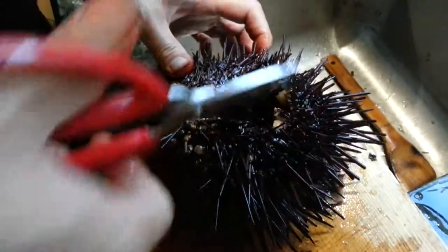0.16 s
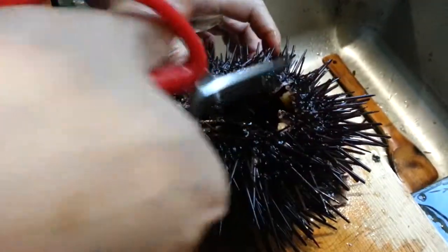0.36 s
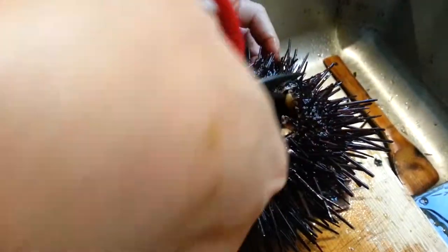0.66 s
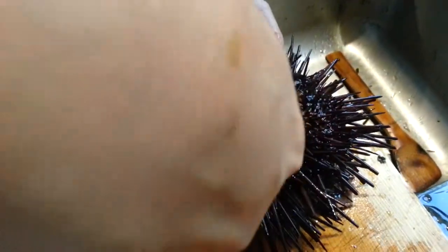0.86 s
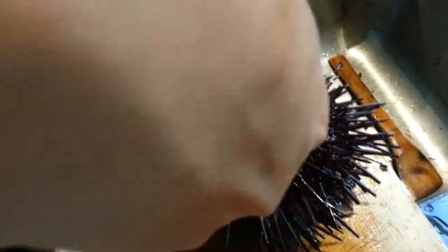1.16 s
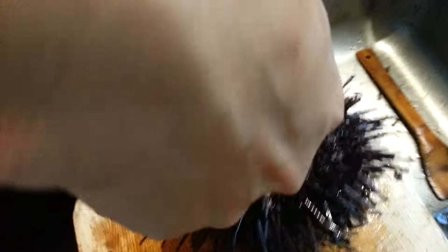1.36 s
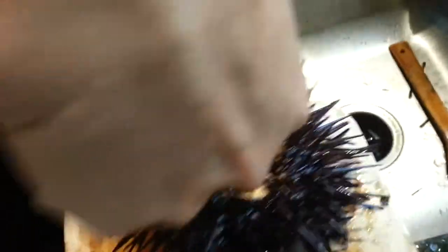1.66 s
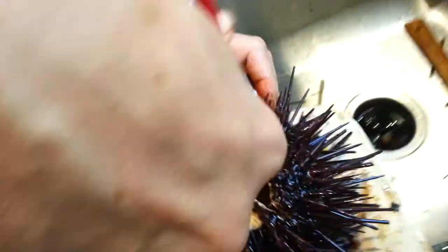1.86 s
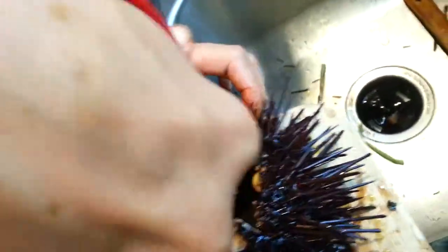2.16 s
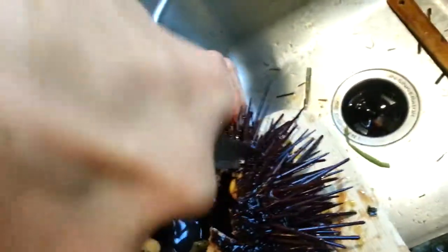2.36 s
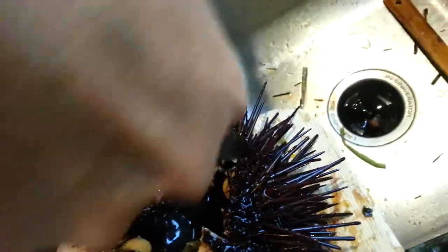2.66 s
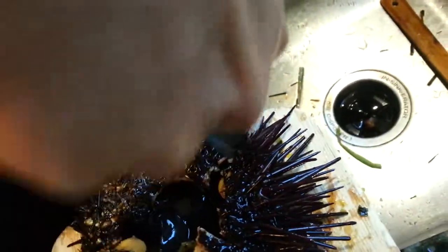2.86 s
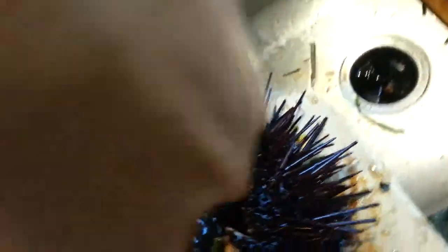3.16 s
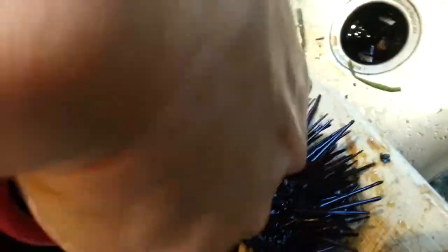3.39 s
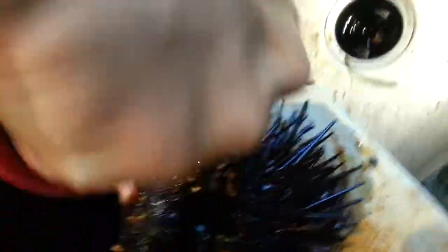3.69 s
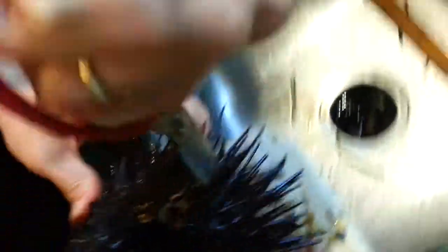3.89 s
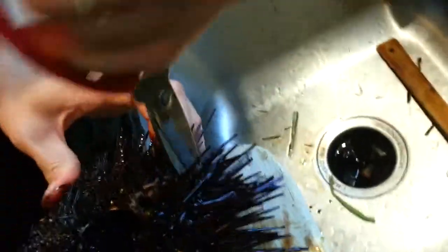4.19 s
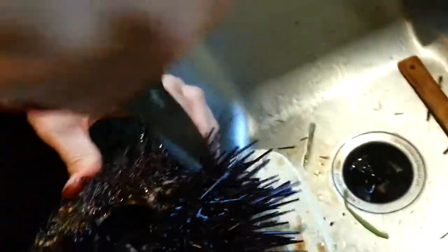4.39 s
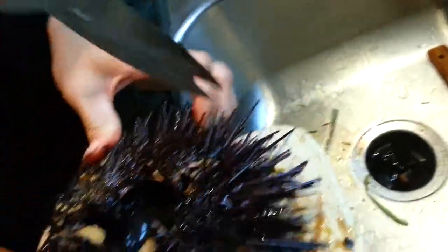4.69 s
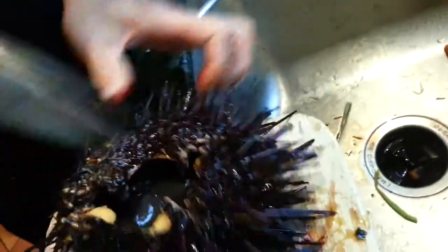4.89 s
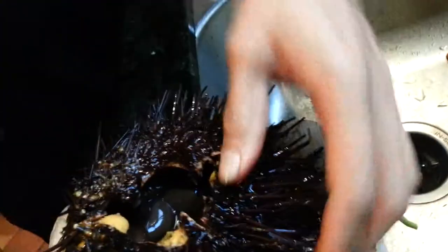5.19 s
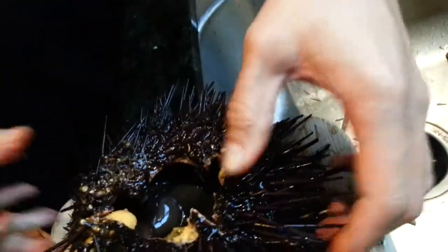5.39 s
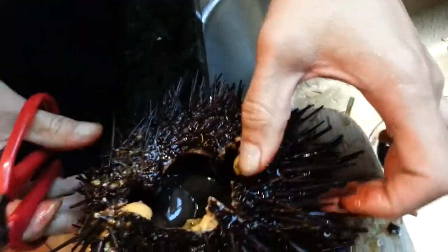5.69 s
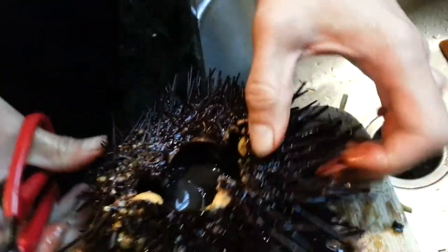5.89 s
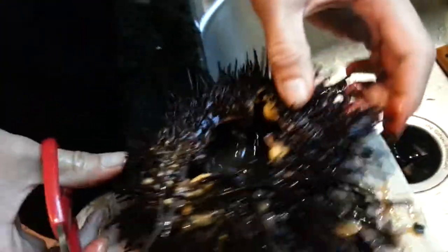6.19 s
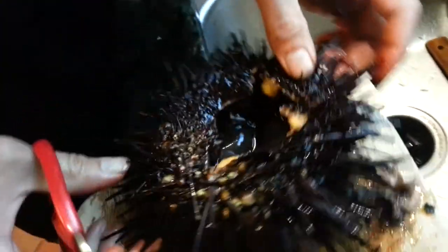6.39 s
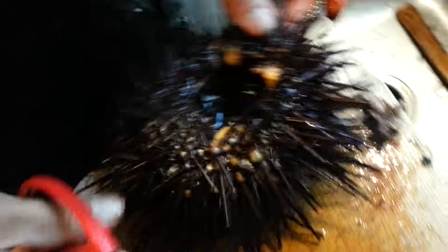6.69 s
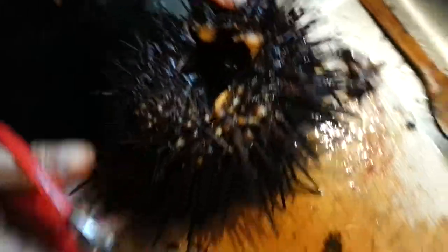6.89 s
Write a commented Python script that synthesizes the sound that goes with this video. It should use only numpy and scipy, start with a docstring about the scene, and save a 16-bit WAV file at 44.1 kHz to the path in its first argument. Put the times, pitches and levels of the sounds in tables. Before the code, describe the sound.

Scissors crunch through a brittle, hollow sea urchin shell in sharp bursts, then rasp, while spines rustle, tick and knock on a wooden board.

```python
"""The shell of a sea urchin breaks under kitchen scissors in clusters of brittle cracks, on a wooden board.
Each crack is a noise burst that excites a board thud, shell resonances and a spray of splinters.
The blades clash, ringing loudest once, and slide along the cut edge as filtered stick-slip noise.
Spines rustle, tick and knock on the board as a hand turns the urchin.
A steel sink and a kitchen return decaying noise echoes; a faint coloured-noise hum lies below."""
import sys
import numpy as np
from scipy import signal
from scipy.fft import rfft, irfft, next_fast_len
from scipy.io import wavfile

SR = 44100
rng = np.random.default_rng(int(sys.argv[2]) if len(sys.argv) > 2 else 0)


def bounce(signal):
    """Save signal as a 16-bit WAV file at the path given by the first command-line argument."""
    frames = np.transpose(np.atleast_2d(signal))
    limited = np.clip(frames, -1, 1)
    pcm = np.round(limited * 32767).astype(np.int16)
    wavfile.write(sys.argv[1], SR, pcm)


N = 310905   # length in samples

# Breaks of shell or spine; sharp ones splinter, dull ones ring the hollow.
# Each row: start in seconds, level in dB, sharpness in dB, left-right balance in dB.
SHELL_CRACKS = [(0.75, -56, -7, 2), (1.03, -63.5, -14.5, 4), (1.047, -54, -7, 2), (1.107, -50, -5, 6),
                (1.202, -59, -17.5, 2), (1.8079, -46, 2, 4), (1.8461, -28, 2, 2.5), (1.875, -30, 3, -0.5),
                (1.8918, -30, 2, 1), (2.016, -35, -4.5, 1), (2.041, -34, 1.5, -1.5), (2.083, -20, -0.5, -3),
                (2.0865, -19.5, 2.5, 5.5), (2.0993, -21, 0, 7.5), (2.1033, -24.5, 4.5, -5.5),
                (2.276, -59, -15, 2), (2.3483, -41.5, 1.5, -3), (2.3638, -20, -2, 2.5),
                (2.393, -33, 2.5, -5), (2.4164, -32, 12, 0.5), (2.4268, -26.5, -2.5, -1.5),
                (2.612, -50, -5.5, -5), (2.625, -50, -6.5, 5), (2.951, -57, 0, -3), (3.009, -52.5, -3.5, 0),
                (3.25, -52.5, -12, 0), (3.4834, -41, 1, 2), (3.492, -38, -1.5, 2),
                (3.5174, -31.5, -0.5, 1.5), (3.556, -38, -0.5, 2), (3.5664, -44, -10.5, 0),
                (3.6118, -36.5, 3, 3), (3.6277, -26.5, 3, 2), (3.7352, -43.5, 2.5, 1),
                (3.7602, -32, 3.5, 0), (3.8826, -36.5, 6, -3), (3.902, -44.5, 14.5, 3),
                (3.984, -43, -8.5, -8), (3.9928, -36, 5, 1.5), (4.305, -42.5, 1.5, -7), (4.851, -49, -5, 0),
                (5.8031, -47.5, 8.5, -1), (6.1907, -40.5, 5.5, 4.5), (6.245, -46.5, 6.5, -2),
                (6.2945, -49, 2.5, 3), (6.374, -41.5, 12.5, 3), (6.8921, -44, 6.5, -1)]
# Resonances of the hollow shell. Each row: frequency in Hz, width in Hz, level in dB.
HOLLOW_MODES = [(765, 55, -6), (930, 55, 3), (970, 300, -9)]
# Resonances of the shell wall. Each row: frequency in Hz, width in Hz, level in dB.
WALL_MODES = [(1445, 38, -3.5), (1684, 130, -5), (1753, 40, -2), (1934, 15, 2), (2006, 48, -6),
              (2190, 28, -7.5), (2794, 70, -5.5), (3000, 41, -7), (4065, 215, -0.5), (3980, 260, -3),
              (5250, 340, -11.5), (1960, 2060, -8.5)]
# Spectrum of splinters and spine tips. Each row: frequency in Hz, level in dB.
SPLINTER_SPECTRUM = [(2500, -11), (4500, 2.5), (6000, -4.5), (7700, -2.5), (10000, -3), (14500, -1.5)]
# Spectrum of a dull thud of the board. Each row: frequency in Hz, level in dB.
THUD_SPECTRUM = [(25, -30), (55, -24), (110, 0.5), (210, 5), (350, 6.5), (550, -0.5), (800, -20),
                 (1500, -71.5)]
THUD_DB, THUD_FOLLOWS = -24, 0.66   # thud under a 0 dB crack; share of the crack's dB that it follows
HOLLOW_PAN_DB, WALL_PAN_DB, SPLINTER_PAN_DB = -2.8, 1, -1   # left-right balance of each part
RUN_S, RUN_GROWTH = 0.0012, 0.15   # decay time of a 0 dB crack; it grows with strength to this power


def shell_cracks():
    """Brittle fracture: each break thumps the board, excites shell modes and splinters; big ones run longer."""
    out = np.zeros((2, N))
    for start_s, db, sharp_db, pan_db in SHELL_CRACKS:
        run_s = RUN_S * from_db(RUN_GROWTH * db)
        burst = fracture(run_s=run_s, run_db=6.0, scatter_db=3, scatter_s=0.0038)
        spray = fracture(run_s=run_s, run_db=8.0, scatter_db=7.5, scatter_s=0.0089)
        thud = from_db(THUD_DB + THUD_FOLLOWS * db) * attack_one(colour(burst, THUD_SPECTRUM))
        hollow = from_db(db - sharp_db) * strike(burst, HOLLOW_MODES, spread_db=1.5)
        wall = from_db(db) * strike(burst, WALL_MODES, spread_db=2.0)
        splinters = from_db(db + sharp_db) * attack_one(colour(spray, SPLINTER_SPECTRUM))
        shell = hollow * sides(HOLLOW_PAN_DB) + wall * sides(WALL_PAN_DB)
        add(out, start_s, thud + shell + splinters * sides(SPLINTER_PAN_DB), pan_db)
    return out


# The blades jump shut. Each row: start in seconds, level in dB.
BLADE_CLASHES = [(1.8465, -42), (1.893, -41), (2.018, -44), (2.0855, -17)]
# Resonances of a blade. Each row: frequency in Hz, width in Hz, level in dB.
BLADE_MODES = [(3890, 42, 0), (3955, 8, -10.5)]


def blade_clashes():
    """Impulse response: a short contact sets the narrow steel resonances ringing."""
    return blows(BLADE_CLASHES, BLADE_MODES)


# The blades slide along the cut edge. Each row: start in seconds, length in seconds, level in dB.
BLADE_SLIDES = [(4.001, 0.29, -27.5), (4.365, 0.11, -40.5)]
# Resonances of blade and shell in the slide. Each row: frequency in Hz, width in Hz, level in dB.
BLADE_SLIDE_MODES = [(880, 120, -7.5), (1640, 420, -6.5), (2900, 780, -3), (3870, 170, 6.5),
                     (4410, 180, 1.5), (4860, 120, 5.5), (5460, 440, -3), (6240, 280, -6.5)]
SLIDE_SWELL = 2.18   # amplitude goes with blade speed to this power


def blade_slide():
    """Stick-slip friction: dense slips on the chalky edge excite blade and shell, loudest in mid-stroke."""
    t, level = np.arange(N) / SR, 0
    for start_s, length_s, db in BLADE_SLIDES:
        speed = np.abs(np.sin(np.pi * np.clip((t - start_s) / length_s, 0, 1)))
        level = level + from_db(db) * speed ** SLIDE_SWELL
    slips = grains(per_s=1400, spread_db=2.0, clump_db=0.4)
    chalk_spectrum = [(900, -24.5), (1500, 8), (3000, -10.0), (6200, -1), (7500, -2.0),
                      (11500, 3.5), (14500, -1.5)]   # Hz, dB
    chalk = colour(slips, chalk_spectrum)
    rasp = rub(slips, BLADE_SLIDE_MODES) + from_db(-4.5) * rms_one(chalk)
    return level * rasp * from_db([[-1.1], [.8]])   # a little to the right


# Level of the steady rustle under the hands. Each row: time in seconds, level in dB.
HANDLING_LEVEL = [(0, -89), (0.3, -68), (1.0, -73), (1.15, -52.5), (1.75, -55.5), (2.2, -50.5), (2.33, -59),
                  (2.55, -57.5), (2.9, -59.5), (3.3, -50), (4.4, -48.5), (4.6, -57.5), (4.95, -51.5),
                  (5.1, -62), (5.5, -62), (6.1, -47), (6.55, -50.5), (7.05, -55.5)]
# Blades or fingers brush through the spines.
# Each row: start in seconds, length in seconds, level in dB, tip hiss relative to it in dB.
SPINE_BRUSHES = [(0.544, 0.048, -62.5, 4), (0.704, 0.066, -54, -4), (0.814, 0.042, -50, 0.5),
                 (1.057, 0.055, -49.5, -0.5), (1.23, 0.12, -48.5, -23), (1.538, 0.12, -44, -5.5),
                 (1.77, 0.082, -39.5, -9), (2.002, .075, -45, -6), (3.007, 0.073, -48, -13),
                 (3.243, .035, -44.5, -7), (3.275, 0.072, -38, -4.5), (3.344, 0.071, -44.5, -25),
                 (3.443, 0.22, -44.5, -16), (3.86, 0.051, -43, -7), (3.937, 0.09, -45.5, -2.5),
                 (4.254, 0.095, -42, -3), (4.375, .085, -44, 4.5), (4.644, 0.12, -44.5, -4),
                 (4.78, 0.093, -44.5, -4), (4.935, 0.051, -50, -6), (5.241, 0.092, -56.5, -4),
                 (5.764, 0.11, -49.5, -7), (5.97, 0.18, -53, -3), (6.09, 0.2, -45, -6),
                 (6.31, 0.18, -48.5, -9), (6.604, 0.17, -45.5, -3.5), (6.888, 0.067, -48, -3)]
# The urchin is dragged over the board. Each row: start in seconds, length in seconds, level in dB.
BOARD_DRAGS = [(0.23, 0.09, -80), (1.1, 0.06, -59), (1.5, 0.072, -59), (1.82, 0.081, -41),
               (3.34, .075, -42.5), (3.49, .18, -43.5), (4.06, 0.13, -36.5), (4.52, 0.051, -53),
               (4.71, .17, -51), (6.02, 0.058, -45.5), (6.13, 0.085, -48), (6.35, 0.19, -58),
               (6.67, 0.13, -50)]
# How firmly the blades sit in the shell. Each row: time in seconds, share from 0 to 1.
BLADE_BITE = [(0, 0.4), (1.0, 0.81), (4.45, 0.97), (4.7, 0.04), (5.8, 0.06)]
# Resonances of the dragged board. Each row: frequency in Hz, width in Hz, level in dB.
RUMBLE_MODES = [(188.8, 58, -8.5), (291, 70, -3.5), (406, 103, -1), (445, 34, 2), (592, 110, -4)]
# Resonances rubbed by blades in the shell. Each row: frequency in Hz, width in Hz, level in dB.
BLADE_GRIND_MODES = [(762, 41, -9), (929, 54, 7.5), (1050, 214, -5), (1453, 116, 1.5), (1770, 58, -4),
                     (2120, 49, -1.5), (2440, 880, -6.5), (3400, 1160, -7), (4200, 300, -2),
                     (4800, 700, -8.5)]
# Resonances of spines rubbed over wood. Each row: frequency in Hz, width in Hz, level in dB.
BOARD_GRIND_MODES = [(887, 300, 0), (1390, 410, 0), (1435, 106, 6), (1640, 92, -7), (1790, 350, -2),
                     (2900, 1700, -2), (3340, 400, 2.5), (4140, 510, -6.5), (4950, 560, -0.5),
                     (6660, 1500, -15)]
# Spectrum of hissing spine tips. Each row: frequency in Hz, level in dB.
TIP_HISS_SPECTRUM = [(3000, -40), (5200, -1.5), (6500, -1), (9000, 2), (14500, 0)]
RUMBLE_DB, HISS_DB = -4.5, -5   # steady board rumble and tip hiss, relative to the steady rustle
CRACKLE_DB = -11.5   # stray crackle, relative to the grind of slips


def spine_rustle():
    """Stick-slip friction: spines rub on each other, blades and wood; sparse slips crackle."""
    hand_db, = in_time(HANDLING_LEVEL)
    brush_rows = [(start_s, length_s, db) for start_s, length_s, db, _ in SPINE_BRUSHES]
    hiss_rows = [(start_s, length_s, db + hiss_db) for start_s, length_s, db, hiss_db in SPINE_BRUSHES]
    dragging = strokes(BOARD_DRAGS, hand_db + RUMBLE_DB)
    brushing = strokes(brush_rows, hand_db)
    flicking = strokes(hiss_rows, hand_db + HISS_DB)
    bite = np.clip(in_time(BLADE_BITE)[0], 0, 1)
    slips = grains(per_s=1900, spread_db=3.5, clump_db=1.6)
    flicks = grains(per_s=1700, spread_db=-2.0, clump_db=2.3)
    snaps = grains(per_s=28, spread_db=1.0, clump_db=0.5)
    rumble = dragging * rub(slips, RUMBLE_MODES)
    # blades in the shell ring its hollow; a bare hand only drives the spines over the wood
    blade_grind = np.sqrt(bite) * rub(slips, BLADE_GRIND_MODES)
    board_grind = np.sqrt(1 - bite) * rub(slips, BOARD_GRIND_MODES)
    soften = signal.butter(2, 6000, fs=SR, output="sos")
    grind = signal.sosfilt(soften, blade_grind + board_grind)
    crackle = from_db(CRACKLE_DB) * rub(snaps, WALL_MODES)
    hiss = flicking * rms_one(colour(flicks, TIP_HISS_SPECTRUM))
    return rumble + brushing * (grind + crackle) + hiss


# Spine tips flick past each other.
# Each row: start in seconds, level in dB, left-right balance in dB.
SPINE_TICKS = [(1.707, -50, 4), (2.944, -53, -4), (3.278, -40.5, 6), (3.343, -52, 2), (4.435, -32, -6),
               (4.576, -58, -9), (4.883, -38.5, -4), (5.134, -57, -5), (5.258, -48, 0), (5.5585, -42, 0),
               (5.871, -48, 0), (6.203, -35, 1), (6.449, -39, -2), (6.517, -45.5, 4), (6.612, -48, -2),
               (6.899, -39, 5)]


def spine_ticks():
    """Small radiators favour the treble: a thin spine tip gives only a bright tick."""
    out = np.zeros((2, N))
    for start_s, db, pan_db in SPINE_TICKS:
        flick = fracture(run_s=0.001, run_db=10.5, scatter_db=6.5, scatter_s=0.0091)
        add(out, start_s, from_db(db) * attack_one(colour(flick, SPLINTER_SPECTRUM)), pan_db)
    return out


# The urchin rocks and knocks on the board. Each row: start in seconds, level in dB.
BOARD_KNOCKS = [(1.03, -51), (1.202, -66), (2.0177, -32), (4.798, -47), (6.145, -40.5), (6.157, -44),
                (6.4715, -27.5), (6.5345, -41.5), (6.747, -57), (6.8365, -48)]
# Resonances of the knocked board. Each row: frequency in Hz, width in Hz, level in dB.
BOARD_MODES = [(393, 55, -3), (624, 43, -1), (746, 170, -8), (1240, 81, 1), (1523, 94, 6.5), (1634, 81, -3),
               (1885, 48, 11), (1540, 540, -1.5), (3740, 130, -11.5), (4740, 430, -15)]


def board_knocks():
    """Modal excitation: a short, hard contact rings the resonances of the board."""
    return blows(BOARD_KNOCKS, BOARD_MODES)


# The urchin's body bumps dully on the board. Each row: start in seconds, level in dB.
BODY_BUMPS = [(1.108, -37), (2.1042, -28), (2.427, -32), (3.6116, -34), (3.808, -47), (4.992, -43.5),
              (6.747, -39), (6.854, -43), (6.968, -45)]


def board_bumps():
    """Soft impact: the heavy, yielding body excites only the low thud."""
    out = np.zeros((2, N))
    for start_s, db in BODY_BUMPS:
        push = fracture(run_s=0.00036, run_db=-15, scatter_db=0, scatter_s=0.0056)
        add(out, start_s, from_db(db) * attack_one(colour(push, THUD_SPECTRUM)))
    return out


def kitchen(x, sink_db, sink_t60, room_db, room_t60):
    """Reverberation: echoes decay exponentially, fast in the steel basin and slower in the kitchen."""
    t = np.arange(SR * 3 // 4) / SR
    onset = np.clip((t - .004) / 0.0032, 0, 1)   # the first echo needs 4 ms
    echoes = diffuse(rng.standard_normal((2, len(t)))) * onset
    response = 0
    for db, t60 in ((sink_db, sink_t60), (room_db, room_t60)):
        response = response + from_db(db) * rms_one(echoes * from_db(-60 * t / t60))
    response = response / np.sqrt(len(t))
    response = colour(response, [(100, 0.96), (500, -1.6), (2000, 0.35), (5000, 1), (14000, -1.1)])  # Hz, dB
    return signal.fftconvolve(x, response, axes=1)[:, :N]


# Spectrum of the kitchen hum. Each row: frequency in Hz, level in dB.
HUM_SPECTRUM = [(20, -9), (38, -28), (52, 0.5), (70, -6.5), (120, 1.5), (200, 0.5), (300, -4.5), (600, -10),
                (1300, -17), (2500, -20), (3500, -18.5), (6000, -26), (14500, -23.5)]


def kitchen_hum():
    """Diffuse field: steady noise, strongest in the bass, comes from all around."""
    return from_db(-56.0) * rms_one(colour(diffuse(rng.standard_normal((2, N))), HUM_SPECTRUM))


def fracture(run_s, run_db, scatter_db, scatter_s, size=4096):
    """Fracture and scattering: an impulse and a dying noise run, then echoes off board, hand and sink."""
    t = np.arange(size) / SR
    run = rng.standard_normal(size) * np.exp(-t / run_s)
    breaks = rms_one(signal.unit_impulse(size)) + from_db(run_db) * rms_one(run)
    direct = np.array([np.roll(breaks, 1), breaks])   # reaches the right side one sample sooner
    scatter = diffuse(rng.standard_normal((2, size))) * np.exp(-t / scatter_s) * (1 - np.exp(-t / 0.00047))
    return rms_one(direct) + from_db(scatter_db) * rms_one(scatter)


def blows(rows, modes):
    """Modal excitation: short contacts set one body ringing."""
    out = np.zeros((2, N))
    for start_s, db in rows:
        contact = fracture(run_s=.0003, run_db=-15, scatter_db=-6, scatter_s=.007)
        add(out, start_s, from_db(db) * strike(contact, modes, spread_db=1.0))
    return out


def strike(x, modes, spread_db):
    """Mode participation: a blow lands on one spot and favours some modes."""
    return attack_one(resonate(x, modes, lambda: from_db(spread_db * rng.standard_normal())))


def rub(x, modes):
    """Moving contact: the sliding point travels, so the favoured modes keep changing."""
    return rms_one(resonate(x, modes, lambda: wander(per_s=55, spread_db=2.2)))


def resonate(x, modes, weight):
    """Modal superposition: parallel resonances, each given its share at the contact point by weight()."""
    out = 0
    for k, (hz, width_hz, db) in enumerate(modes):
        r = np.exp(-np.pi * width_hz / SR)   # pole radius
        top = (-1) ** k * from_db(db) * (1 - r * r) / 2   # alternating sign
        poles = [1, -2 * r * np.cos(2 * np.pi * hz / SR), r * r]
        out = out + weight() * signal.lfilter([top, 0, -top], poles, x + 1e-18)
    return out


def grains(per_s, spread_db, clump_db):
    """Stick-slip: clumped clicks of uneven size are smeared into noise by nearby surfaces."""
    sizes = from_db(spread_db * np.minimum(rng.exponential(1, N), 4))
    sizes = sizes * wander(per_s=120, spread_db=clump_db)
    clicks = (rng.random(N) < per_s / SR) * sizes
    decay = np.exp(-1 / (.002 * SR))   # energy dies away over 2 ms
    energy = signal.lfilter([1], [1, -decay], clicks ** 2 + 1e-18)
    return diffuse(np.sqrt(energy) * rng.standard_normal((2, N)))


STROKE_RISE, STROKE_RELEASE_S = 0.37, 0.017   # rise as a share of stroke length; release time in seconds


def strokes(rows, steady_db):
    """Power summation: each stroke builds, holds and dies away on top of a steady level."""
    t, power = np.arange(N) / SR, from_db(steady_db) ** 2
    for start_s, length_s, db in rows:
        rise = np.clip((t - start_s) / (STROKE_RISE * length_s), 0, 1)
        release = np.exp(-np.clip((t - start_s - length_s) / STROKE_RELEASE_S, 0, 20))
        power = power + (from_db(db) * rise * release) ** 2
    return np.sqrt(power)


def wander(per_s, spread_db):
    """Random modulation: a gain drifts between random knots."""
    knots = from_db(spread_db * rng.standard_normal(4000))
    return np.interp(np.arange(N) * per_s / SR, np.arange(len(knots)), knots)


# Likeness of the two ears in diffuse sound. Each row: frequency in Hz, correlation from -1 to 1.
EAR_LIKENESS = [(100, 0.78), (500, 0.48), (1000, 0.29), (2000, 0), (4000, 0.11), (8000, 0), (15000, 0.09)]


def diffuse(pair):
    """Interaural coherence: unrelated signals become left and right, alike in the bass, apart in the treble."""
    n = pair.shape[-1]
    size = next_fast_len(n, True)
    alike = np.clip(at_hz(EAR_LIKENESS, size), -.99, .99)
    mid, side = rfft(pair, size) * np.sqrt([1 + alike, 1 - alike]) / np.sqrt(2)
    return irfft([mid + side, mid - side], size)[:, :n]


def colour(x, spectrum):
    """Minimum phase: a causal filter follows from the given spectrum through its folded cepstrum."""
    n = x.shape[-1]
    size = next_fast_len(n + 2048, True)
    cepstrum = irfft(np.log(from_db(at_hz(spectrum, size))), size)
    cepstrum[1:size // 2] *= 2
    cepstrum[size // 2 + 1:] = 0
    return irfft(rfft(x, size) * np.exp(rfft(cepstrum)), size)[..., :n]


def at_hz(points, size):
    """Logarithmic frequency scale: a table is interpolated at the bins of a transform."""
    hz, value = np.transpose(points)
    bins_hz = np.arange(size // 2 + 1) * SR / size
    return np.interp(np.log(bins_hz + 1), np.log(hz), value)


def in_time(rows):
    """Linear interpolation: columns of a curve at every sample."""
    s, *columns = np.transpose(rows)
    return [np.interp(np.arange(N) / SR, s, c) for c in columns]


def from_db(db):
    """Decibel scale: level to amplitude gain."""
    return 10 ** (np.asarray(db) / 20)


def rms_one(x):
    """Effective value: scale to rms 1."""
    return x / np.sqrt(np.mean(x ** 2) + 1e-20)


def attack_one(x):
    """Effective value of the attack: scale a blow so that its first 8 ms have rms 1."""
    return x / np.sqrt(np.mean(x[..., :350] ** 2) + 1e-20)


def sides(pan_db):
    """Level difference between the ears: left and right gains, positive to the left."""
    return from_db([[pan_db / 2], [-pan_db / 2]])


def add(out, start_s, sound, pan_db=0):
    """Superposition: mix a sound in at its start time."""
    i = int(start_s * SR)
    n = min(sound.shape[-1], N - i)
    out[:, i:i + n] += sound[..., :n] * sides(pan_db)


# Level of the treble above 10 kHz. Each row: time in seconds, level in dB.
TREBLE_LEVEL = [(0, -5), (.57, 4), (1.6, -3), (2.2, -3), (3.2, -5), (3.6, 7), (4.15, -5.5), (4.75, -0.5),
                (6.9, 1.5)]


def scene():
    """Superposition: near sounds with drifting treble, their reverberation and the hum."""
    struck = board_knocks() + blade_clashes() + board_bumps()
    near = shell_cracks() + spine_ticks() + struck + spine_rustle() + blade_slide()
    top = signal.sosfilt(signal.butter(3, 10000, "high", fs=SR, output="sos"), near)
    rest = signal.sosfilt(signal.butter(3, 10000, fs=SR, output="sos"), near)
    near = rest + from_db(in_time(TREBLE_LEVEL)[0]) * top
    # small bodies radiate no deep bass
    near = signal.sosfilt(signal.butter(2, 70, "high", fs=SR, output="sos"), near)
    echoes = kitchen(near, sink_db=-10, sink_t60=0.095, room_db=-17.0, room_t60=0.36)
    return near + echoes + kitchen_hum()


CUTOFF_HZ = 14550


def record(dry):
    """Band limiting: a steep elliptic low-pass cuts the top."""
    return signal.sosfilt(signal.ellip(10, .2, 80, CUTOFF_HZ, fs=SR, output="sos"), dry)


dry = scene()
out = record(dry)
bounce(out)
```